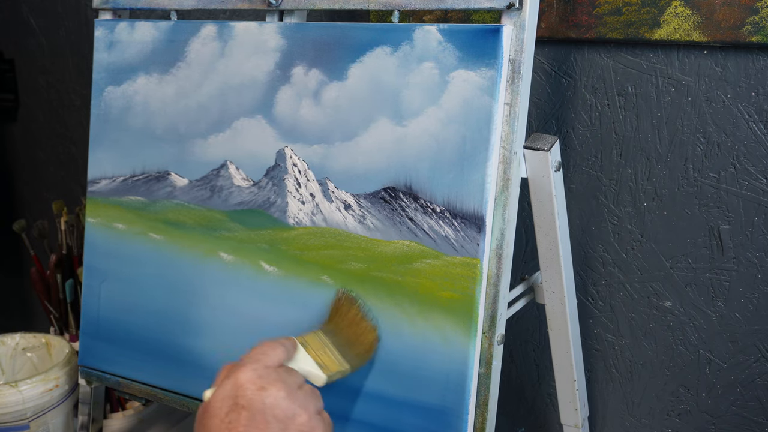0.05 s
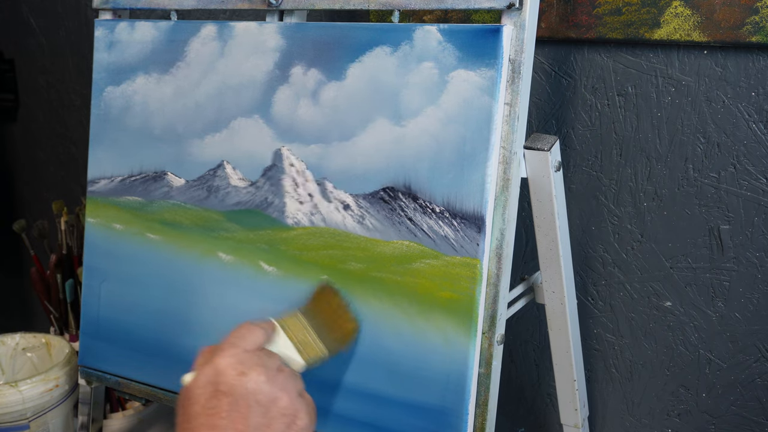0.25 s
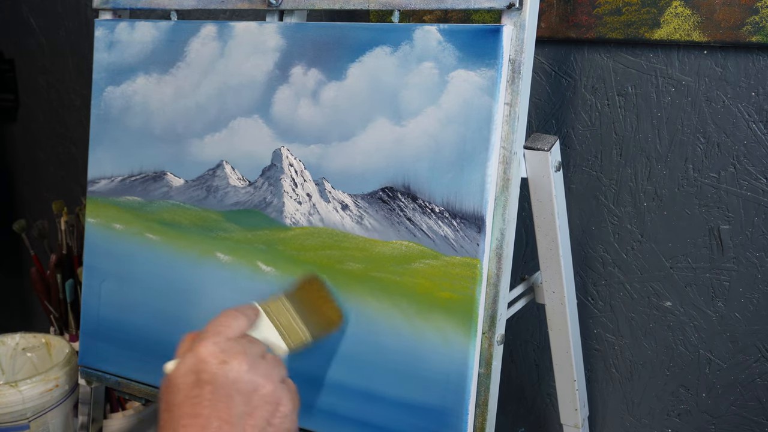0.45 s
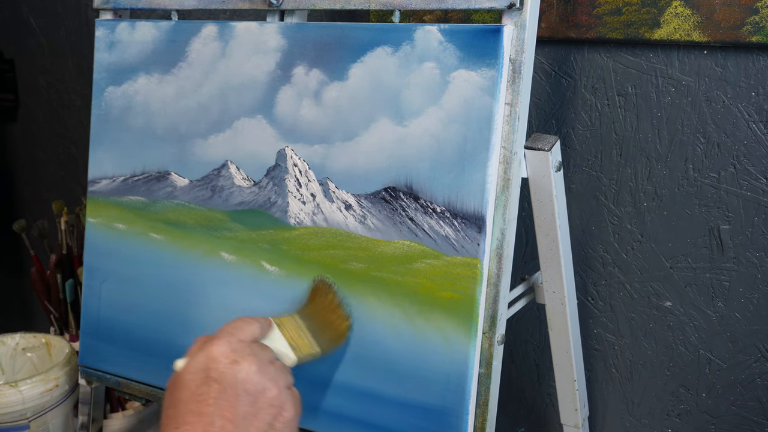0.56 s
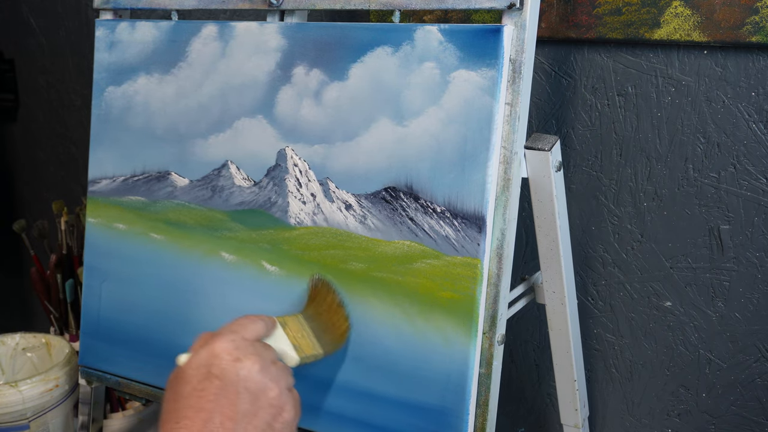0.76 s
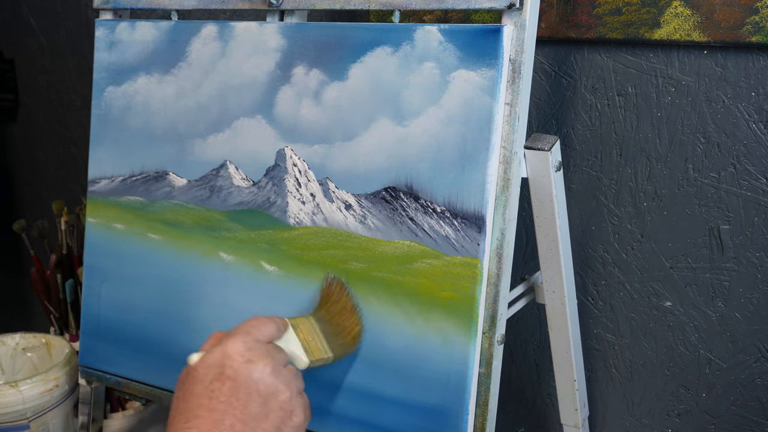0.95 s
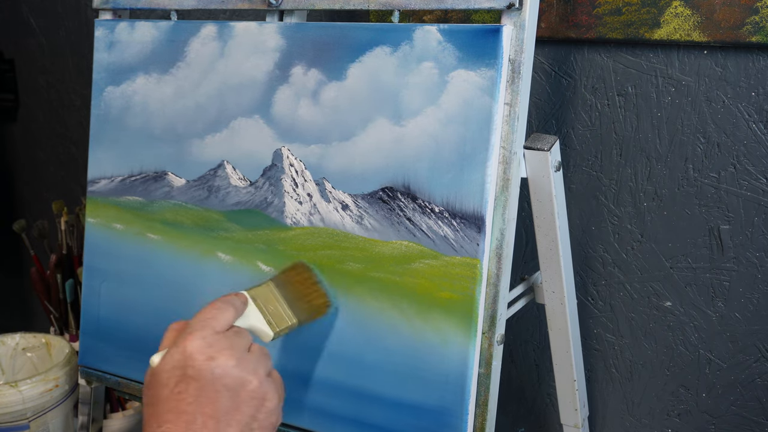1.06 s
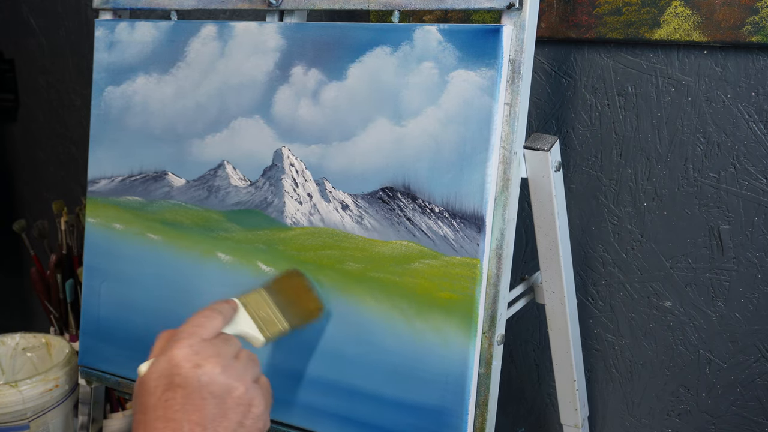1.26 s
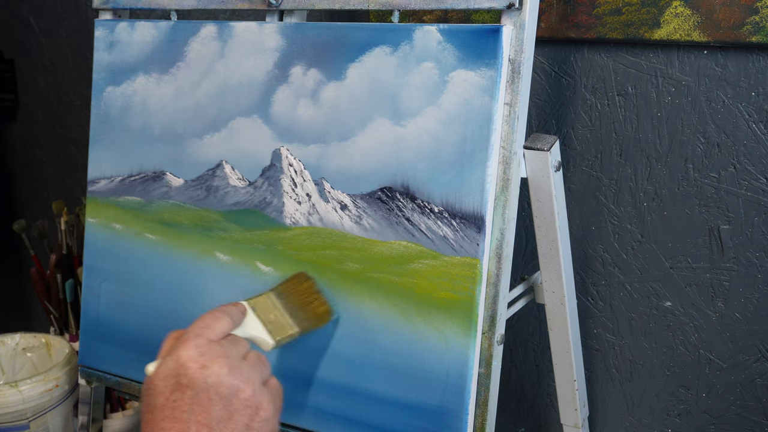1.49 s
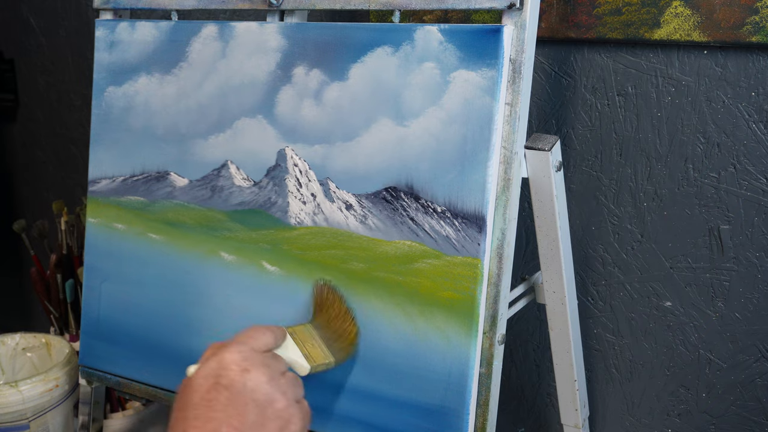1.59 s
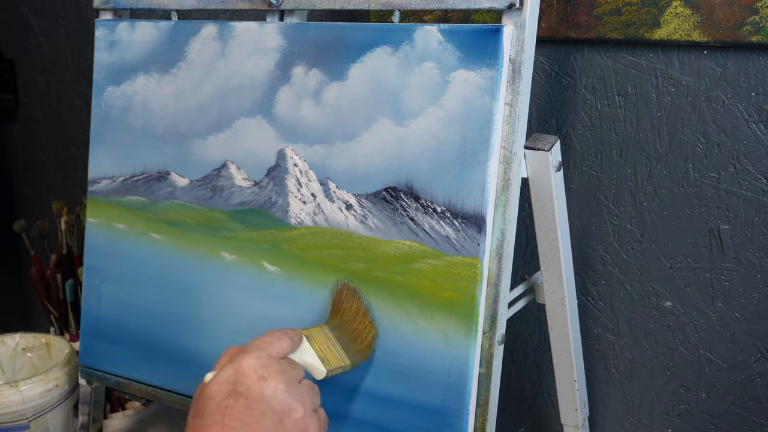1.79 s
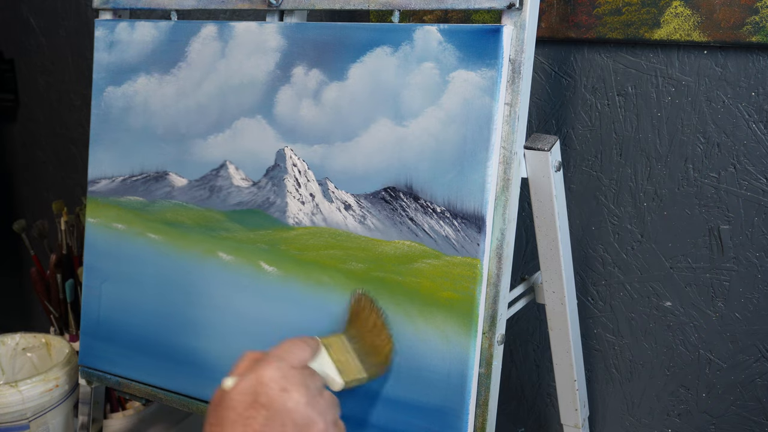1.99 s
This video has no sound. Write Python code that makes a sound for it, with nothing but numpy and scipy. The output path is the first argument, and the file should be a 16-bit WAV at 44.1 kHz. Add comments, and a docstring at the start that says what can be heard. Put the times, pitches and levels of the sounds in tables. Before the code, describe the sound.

A broad paintbrush dabs a stretched canvas. Bristles drag and lift at the very start, then dabs land from about 0.07 s, every 0.21 s, until 2.0 s. Each has a light tip touch, a crunchy crush about 0.04 s later, hollow cloth jolts and a low rebound, then a soft wet hiss. Tiny bristle snaps, notably near 1.4 s. Close, dry; quiet room tone, very faint high whine.

```python
"""Quiet room tone with a faint high whine; bristles drag through wet paint with a hiss and lift.
A wide brush is then dabbed on a stretched canvas nearly five times a second: tips touch, bristles
crush with a crunch, cloth jolts, drums and rebounds with a low thump, then each dab drags and lifts.
Random slips drive resonators (touch, crush, drumming) and filters (hisses); swings are sines;
bristle snaps are short noise bursts."""
import sys
import numpy as np
from scipy import signal
from scipy.fft import rfft, irfft
from scipy.io import wavfile

SR = 44100
rng = np.random.default_rng(int(sys.argv[2]) if len(sys.argv) > 2 else 0)


def gain_from_decibels(decibels):
    """Convert decibel values to linear amplitude factors."""
    exponent = np.asarray(decibels, float) / 20
    return 10 ** exponent


def bounce(signal):
    """Save signal as a 16-bit WAV file at the path given by the first command-line argument."""
    frames = np.transpose(np.atleast_2d(signal))
    limited = np.clip(frames, -1, 1)
    pcm = np.round(limited * 32767).astype(np.int16)
    wavfile.write(sys.argv[1], SR, pcm)


N = 89611
T = np.arange(N) / SR


def rms_one(x):
    """Scale to rms 1."""
    return x / np.sqrt(np.mean(x ** 2) + 1e-20)


def coloured(x, spectrum):
    """Minimum-phase filter from a (f/Hz, level/dB) table, via the folded cepstrum; rms 1."""
    hz, db = np.transpose(spectrum)
    bins_hz = np.fft.rfftfreq(8192, 1 / SR)
    gain_db = np.interp(np.log(bins_hz + 1), np.log(hz), db)
    cepstrum = irfft(np.log(gain_from_decibels(np.maximum(gain_db, -70))))
    cepstrum[1:4096] *= 2
    cepstrum[4097:] = 0
    impulse = irfft(np.exp(rfft(cepstrum)))[:4096]
    return rms_one(signal.fftconvolve(x, impulse)[:N])


def grains(per_s, uneven_db):
    """Slips as random impulses of either sign and uneven size; rms 1."""
    chance = rng.random(N)
    size = np.minimum(rng.exponential(1, N), 5)
    return rms_one((chance < per_s / SR) * gain_from_decibels(uneven_db * size) * rng.choice([-1, 1], N))


def flicker(rate_hz, depth_db):
    """Wandering gain: noise through a two-pole lowpass, in dB of rms depth_db."""
    r = np.exp(-2 * np.pi * rate_hz / SR)
    noise = rng.standard_normal(N + SR)
    wander = signal.lfilter([1], [1, -2 * r, r * r], noise)[SR:]  # drop filter start-up
    return gain_from_decibels(depth_db * rms_one(wander))


def bump(at_s, rise_s, fall_s):
    """Swell peaking at 1: Gaussian rise, sech fall."""
    t = T - at_s
    rise = np.exp(-.5 * (t / rise_s) ** 2)
    fall = 1 / np.cosh(np.minimum(t / fall_s, 50) * 2)
    return np.where(t < 0, rise, fall)


def contact(touch_s):
    """Contact gate: opens over 0.5 ms from the touch."""
    return np.clip((T - touch_s) / 0.0005, 0, 1)


def thump(at_s, db, hz, t60_s, rise_s):
    """Low swing of the whole cloth: sine with linear attack and exponential decay."""
    t = np.maximum(T - at_s, 0)
    return gain_from_decibels(db - 60 * t / t60_s) * np.minimum(t / rise_s, 1) * np.sin(2 * np.pi * hz * t)


# canvas and frame resonances: (f/Hz, width/Hz, level/dB)
CANVAS_MODES = [(29.5, 19, -10), (76, 20, -6.5), (117, 48, -4), (183.2, 35.7, 0), (250, 33, 1.5),
                (330, 83, -8.5), (400, 49.5, 0.5), (451.3, 71, -3.5), (607, 45, -9), (873, 25, -1.5),
                (1144, 71, -2.5), (1325, 69, -5.5), (1536, 93, -11.5), (1970, 190, -13.5), (2286, 67, -8),
                (3010, 350, -17), (3840, 83, -13.5)]


def canvas(force):
    """Force into parallel two-pole resonances of cloth and frame, alternating in sign."""
    out = 0
    for k, (hz, width_hz, db) in enumerate(CANVAS_MODES):
        r = np.exp(-np.pi * width_hz / SR)
        zeros = np.array([1, 0, -1]) * (1 - r * r) / 2
        poles = [1, -2 * r * np.cos(2 * np.pi * hz / SR), r * r]
        out = out + (-1) ** k * gain_from_decibels(db) * signal.lfilter(zeros, poles, force)
    return out


# room tone spectrum: (f/Hz, relative level/dB)
ROOM_SPECTRUM = [(18, -31), (30, -4.5), (64, -1), (117, -7.5), (284, -6), (1140, -12), (1510, -6.5),
                 (1970, -15.5), (3320, -13.5), (13600, -28.5), (15500, -31)]
ROOM_DB = -63


def room_tone():
    """Steady background: white noise shaped by the room spectrum."""
    return gain_from_decibels(ROOM_DB) * coloured(rng.standard_normal(N), ROOM_SPECTRUM)


WHINE_HZ, WHINE_DB = 15733, -86


def whine():
    """Faint steady sine."""
    return gain_from_decibels(WHINE_DB) * np.sin(2 * np.pi * WHINE_HZ * T)


DRUM_TOP_HZ, DRUM_RISE_S, DRUM_FADE_S = 550, 0.028, 0.11


def canvas_rumble():
    """Slips excite the canvas modes; low part, rms 1."""
    lowpass = signal.butter(4, DRUM_TOP_HZ, fs=SR, output="sos")
    return rms_one(signal.sosfilt(lowpass, canvas(grains(900, uneven_db=1.5))))


# dabs: (touch t/s, touch level/dB, crush delay/s, crush level/dB, drumming level/dB)
DAB_EVENTS = [(-.14, -52, 0.063, -31, -51.5), (0.074, -56.5, 0.042, -39.5, -50),
              (.285, -76, 0.05, -38.5, -48.5), (.510, -53, 0.042, -38, -51.5),
              (.711, -54, 0.046, -37.5, -49), (.927, -47, 0.043, -38, -48), (1.145, -48.5, 0.037, -40, -50),
              (1.358, -54.5, 0.043, -36.5, -46.5), (1.567, -50, 0.045, -37.5, -47),
              (1.780, -54, 0.041, -38, -51), (2.007, -54, 0.029, -40, -50.5)]


def drumming(rumble):
    """Canvas drums around each crush: the rumble swells and flickers slowly."""
    swell = 0
    for touch_s, _, crush_delay_s, _, drum_db in DAB_EVENTS:
        shape = bump(touch_s + crush_delay_s, DRUM_RISE_S, DRUM_FADE_S)
        swell = swell + gain_from_decibels(drum_db) * contact(touch_s) * shape
    return swell * flicker(29, depth_db=2.8) * rumble


# drag after each dab: (lift delay from touch/s, level/dB)
DRAG_EVENTS = [(0.1607, -55), (.163, -56.5), (0.1715, -56), (0.17, -57), (0.1624, -56.5), (0.16, -57.5),
               (.160, -56.5), (0.17, -57), (0.173, -55), (0.18, -55.5), (.16, -55)]
# drag hiss spectrum: (f/Hz, relative level/dB per Hz)
DRAG_SPECTRUM = [(180, -32), (300, -4.5), (571, -13.5), (892, -6.5), (2070, -8.5), (2250, -8.5),
                 (3340, -11), (3750, -8.5), (4140, -14.5), (5300, -15.5), (15500, -25.5)]
DRAG_SWELL_DB, SWELL_S, LIFT_S = 3, 0.041, 0.011


def bristle_drag():
    """Bristles drag back through wet paint: dense slips hiss, swell and stop at the lift."""
    level = 0
    for (touch_s, *_), (lift_delay_s, drag_db) in zip(DAB_EVENTS, DRAG_EVENTS):
        left_s = touch_s + lift_delay_s - T
        swell = gain_from_decibels(drag_db + DRAG_SWELL_DB * np.exp(-(left_s / SWELL_S) ** 2))
        lift = 1 / (1 + np.exp(-np.clip(left_s / LIFT_S * 2, -40, 40)))
        level = level + contact(touch_s) * swell * lift
    unsteady = flicker(24, depth_db=1.5) * flicker(153, depth_db=1.5)
    return level * unsteady * coloured(grains(9000, uneven_db=1.0), DRAG_SPECTRUM)


# single bristles snap free: (t/s, level/dB, f/Hz)
SNAP_EVENTS = [(.0045, -37.5, 3300), (0.121, -49, 1300), (0.2283, -47, 3900), (.306, -55, 5000),
               (.341, -55, 1400), (0.554, -50, 2000), (.567, -42, 2500), (.585, -44.5, 3500),
               (0.837, -45, 7000), (1.403, -36, 1400), (0.928, -69, 2500), (1.358, -50, 6940),
               (1.459, -60, 12000), (1.635, -40, 9000), (1.89, -43.5, 9000)]
SNAP_FADE_S = 0.00082


def snaps():
    """Each freed bristle is a decaying noise burst, up to an octave either side of its pitch."""
    out, noise = 0, rng.standard_normal(N)
    for at_s, db, hz in SNAP_EVENTS:
        edges_hz = [hz / 2, min(hz * 2, 19000)]
        band = signal.sosfilt(signal.butter(2, edges_hz, "band", fs=SR, output="sos"), noise)
        decay = (T > at_s) * np.exp(-np.maximum(T - at_s, 0) / SNAP_FADE_S)
        out = out + gain_from_decibels(db) * rms_one(band) * decay
    return out


def canvas_crunch():
    """Very uneven slips excite the canvas modes; highpassed, rms 1."""
    highpass = signal.butter(1, DRUM_TOP_HZ, "high", fs=SR, output="sos")
    return rms_one(signal.sosfilt(highpass, canvas(grains(1500, uneven_db=6.0))))


# bristle hiss spectrum: (f/Hz, relative level/dB per Hz)
BRISTLE_SPECTRUM = [(290, -30.5), (500, -7), (706, -13.5), (1200, -7.5), (2290, -12), (2650, -16.5),
                    (3850, -12), (4130, -13.5), (13600, -27), (15500, -41.5)]
TOUCH_FADE_S = 0.011
CRUSH_RISE_S, CRUSH_FALL_S = 0.0078, 0.014
HISS_RISE_S, HISS_FALL_S, CRUSH_HISS_DB = 0.02, 0.033, -6.5  # dB re crush


def touch_and_crush(crunch):
    """Tips touch, bristles crush flat: crunch through the canvas plus direct bristle hiss."""
    touch = crush = hiss = 0
    for touch_s, touch_db, crush_delay_s, crush_db, _ in DAB_EVENTS:
        on = contact(touch_s)
        peak_s = touch_s + crush_delay_s
        decay = np.exp(-np.maximum(T - touch_s, 0) / TOUCH_FADE_S)
        touch = touch + gain_from_decibels(touch_db) * on * decay
        crush = crush + gain_from_decibels(crush_db) * on * bump(peak_s, CRUSH_RISE_S, CRUSH_FALL_S)
        hiss_gain = gain_from_decibels(crush_db + CRUSH_HISS_DB)
        hiss = hiss + hiss_gain * on * bump(peak_s, HISS_RISE_S, HISS_FALL_S)
    through_canvas = (crush + gain_from_decibels(-1.5) * touch) * flicker(150, depth_db=1.28) * crunch
    direct = (hiss + touch) * flicker(300, depth_db=1.5)
    return through_canvas + direct * coloured(grains(5000, uneven_db=1.5), BRISTLE_SPECTRUM)


KNOCK_DB, KNOCK_S = 18, 0.00083  # dB re touch


def touch_knock():
    """Each touch after the start pushes the canvas modes with one short raised-cosine force."""
    at_s, touch_db = np.transpose([row[:2] for row in DAB_EVENTS if row[0] >= 0])
    force = np.zeros(N)
    force[(at_s * SR).astype(int)] = gain_from_decibels(touch_db + KNOCK_DB)
    pulse = np.hanning(int(KNOCK_S * SR) + 3)
    return canvas(signal.lfilter(pulse, 1, force + 1e-18))


GIVE_HZ, GIVE_DB, GIVE_T60_S = 97.6, 1.5, 0.13  # dB re touch


def cloth_give():
    """The whole cloth gives way at each touch: a decaying low sine."""
    return sum(thump(touch_s, touch_db + GIVE_DB, GIVE_HZ, GIVE_T60_S, rise_s=0.0025)
               for touch_s, touch_db, *_ in DAB_EVENTS)


# jolts, pitch follows the cloth tension under the brush: (peak t/s, level/dB, f/Hz)
JOLT_EVENTS = [(0.094, -51, 316.7), (0.121, -35, 410), (0.14, -39, 349), (0.155, -40, 250),
               (.207, -42.5, 330), (0.323, -32, 330), (.330, -31, 400), (0.36, -35, 252.4),
               (0.375, -36, 268.8), (0.413, -43, 300), (.537, -35.5, 400), (0.546, -36.5, 360),
               (0.58, -42.5, 280), (0.73, -43, 370.5), (0.75, -34.5, 356), (0.784, -39.5, 330),
               (0.931, -41, 200), (.955, -30.5, 275.6), (.965, -29, 445), (1.016, -38, 386),
               (1.166, -35, 250), (1.177, -38, 289.8), (1.217, -40, 312), (1.388, -49, 285.4),
               (1.397, -33.5, 291.2), (1.431, -33, 238), (1.446, -35, 290), (1.578, -38.5, 316),
               (1.597, -38, 254.7), (1.606, -40.5, 350), (1.639, -39, 260), (1.657, -45, 270),
               (1.790, -44.5, 273.6), (1.818, -31, 390), (1.858, -38, 230), (1.871, -45, 293),
               (2.022, -50, 389.2)]
JOLT_RISE_CYCLES, JOLT_FALL_CYCLES = 0.45, 1.31


def jolts():
    """Tense cloth jolts: sines of random phase under bumps a few cycles long."""
    out = 0
    phases = rng.random((len(JOLT_EVENTS), 1)) * 2 * np.pi
    for (peak_s, db, hz), phase in zip(JOLT_EVENTS, phases):
        shape = bump(peak_s, JOLT_RISE_CYCLES / hz, JOLT_FALL_CYCLES / hz)
        out = out + gain_from_decibels(db) * shape * np.sin(2 * np.pi * hz * T + phase)
    return out


# canvas rebounds: (t/s, level/dB, f/Hz)
REBOUND_EVENTS = [(0.14, -45, 45.7), (0.353, -43, 45), (.570, -46, 45), (.774, -42.5, 45), (0.986, -42, 45),
                  (1.199, -47, 44.4), (1.416, -38.5, 44.7), (1.625, -40, 45), (1.838, -43, 44)]
REBOUND_T60_S = .065


def rebounds():
    """Canvas springs back: short decaying low sines."""
    return sum(thump(at_s, db, hz, REBOUND_T60_S, rise_s=.005) for at_s, db, hz in REBOUND_EVENTS)


def scene():
    """Sum of brush, cloth, snaps and background, one channel."""
    crunch = canvas_crunch()
    rumble = canvas_rumble()
    brush = touch_and_crush(crunch) + drumming(rumble) + bristle_drag() + touch_knock()
    cloth = jolts() + rebounds() + cloth_give()
    return (brush + cloth + snaps() + room_tone() + whine())[None]


def low_pass(x):
    """Removes everything above the highest recorded frequency."""
    return signal.sosfilt(signal.butter(12, 15750, fs=SR, output="sos"), x)


MIC_DIP_HZ, MIC_DIP_WIDTH_HZ, MIC_DIP_DB = 10770, 2300, -6
CUTOFF_HZ = 15760


def record(dry):
    """Microphone with a treble dip (resonant band partly subtracted), then a steep lowpass."""
    b, a = signal.iirpeak(MIC_DIP_HZ, MIC_DIP_HZ / MIC_DIP_WIDTH_HZ, fs=SR)
    dipped = dry - (1 - gain_from_decibels(MIC_DIP_DB)) * signal.lfilter(b, a, dry)
    lowpass = signal.ellip(12, .5, 60, CUTOFF_HZ, fs=SR, output="sos")
    finished = signal.sosfilt(lowpass, dipped)
    return low_pass(finished)


dry = scene()
out = record(dry)
bounce(out)
```